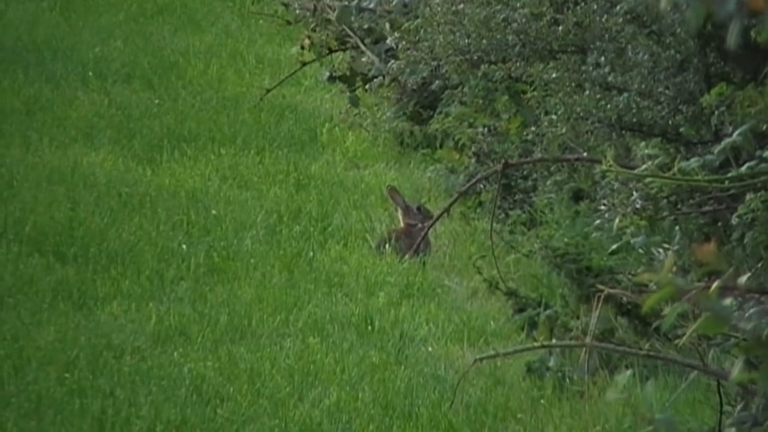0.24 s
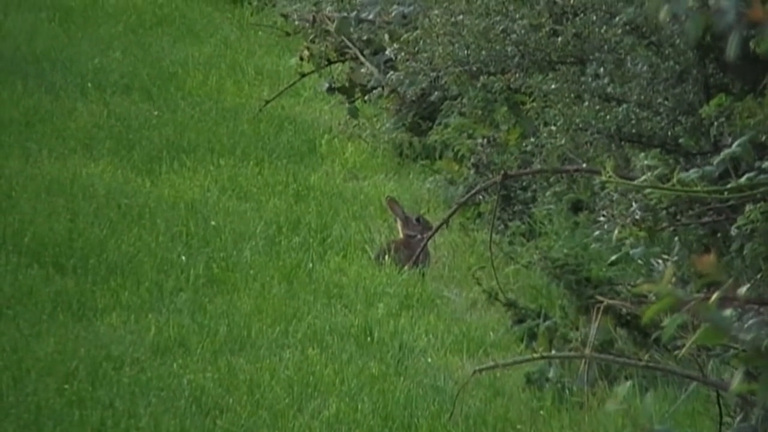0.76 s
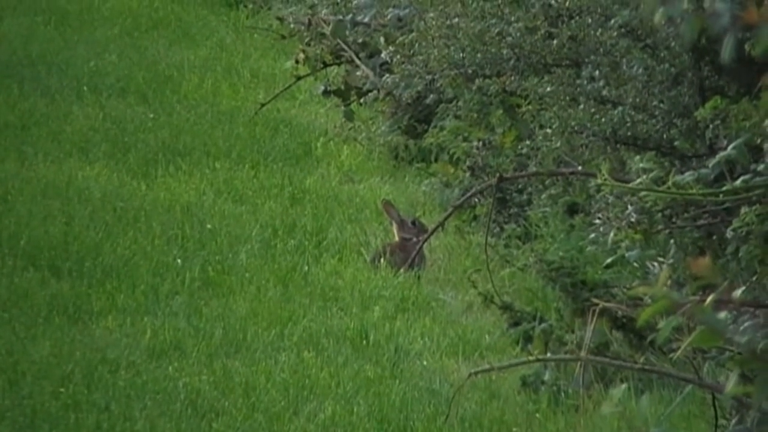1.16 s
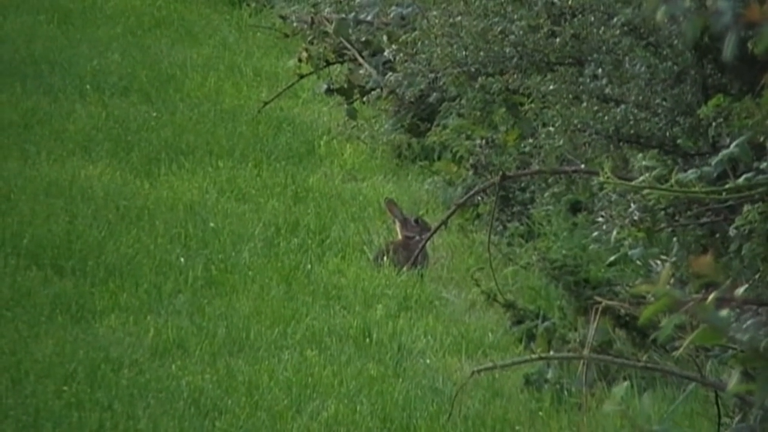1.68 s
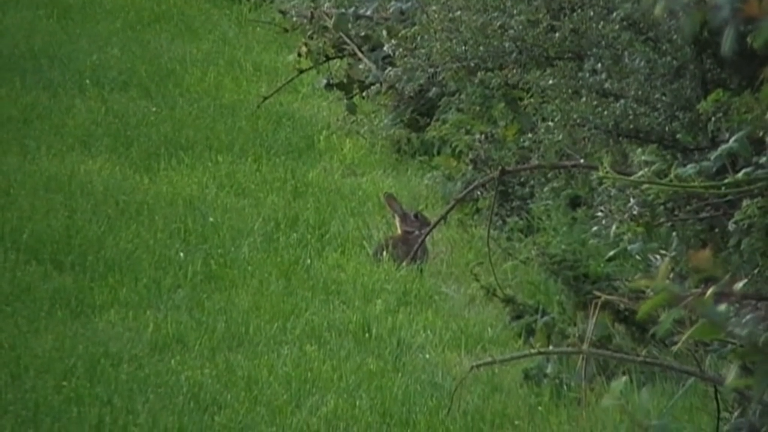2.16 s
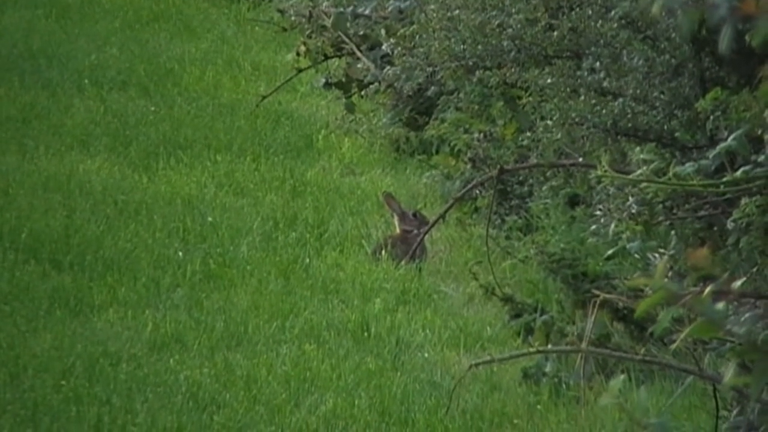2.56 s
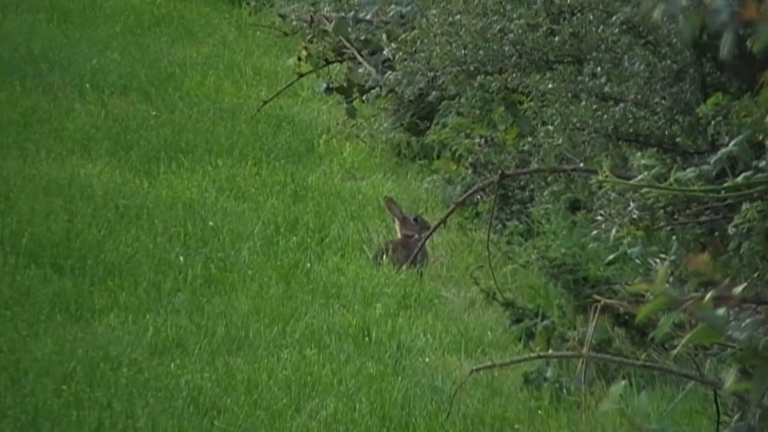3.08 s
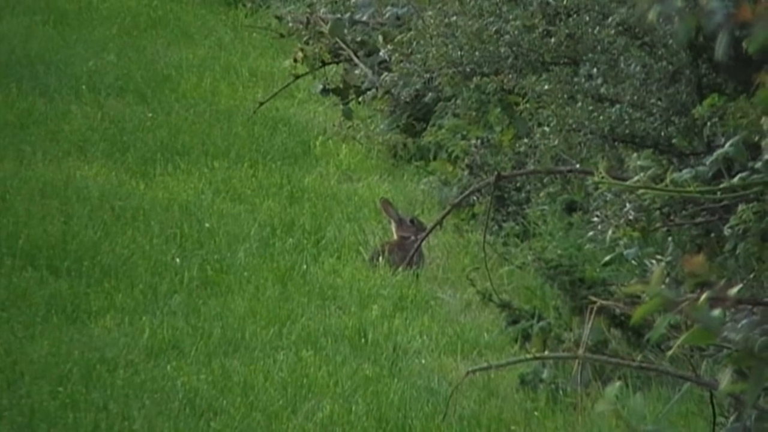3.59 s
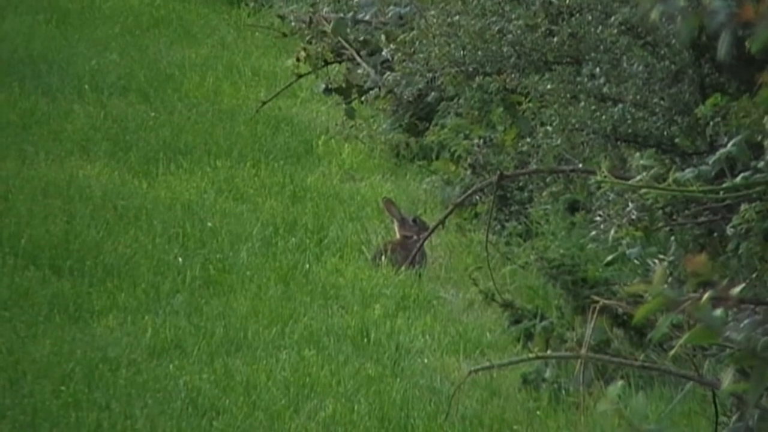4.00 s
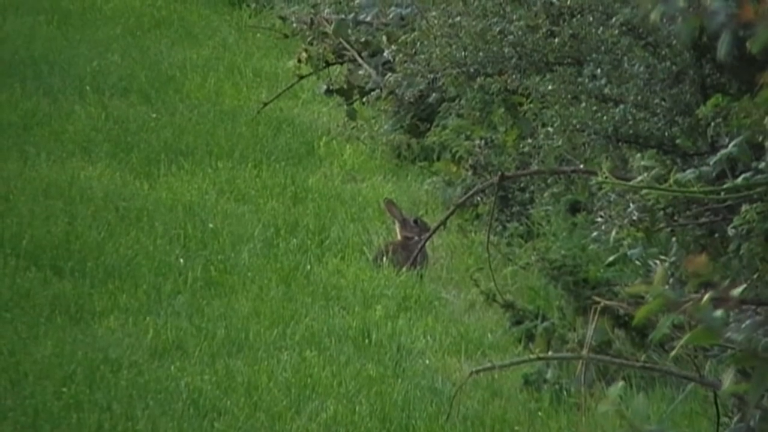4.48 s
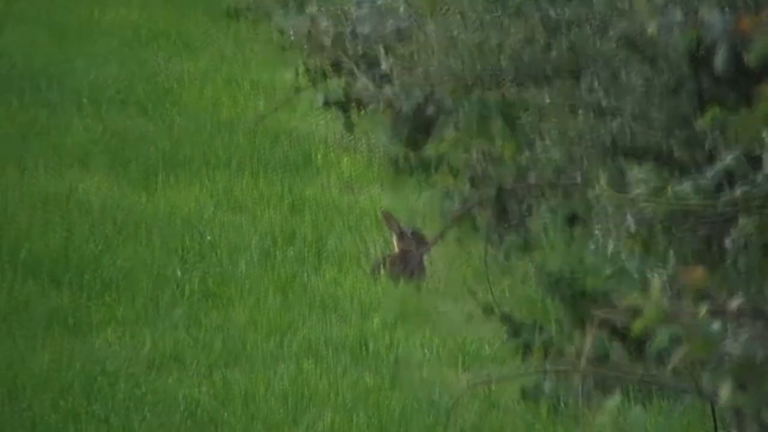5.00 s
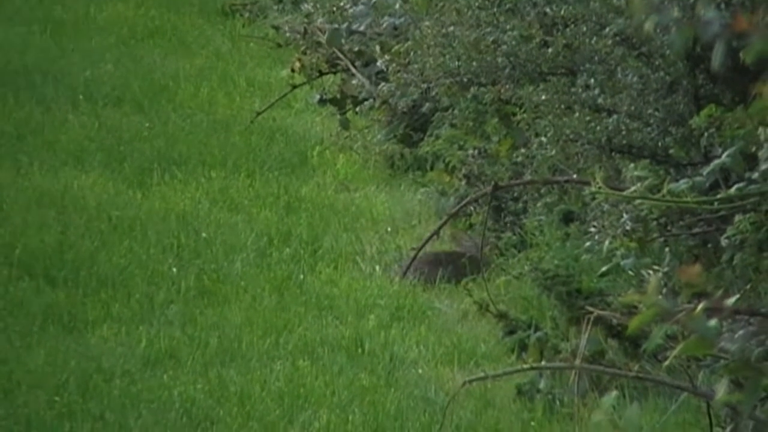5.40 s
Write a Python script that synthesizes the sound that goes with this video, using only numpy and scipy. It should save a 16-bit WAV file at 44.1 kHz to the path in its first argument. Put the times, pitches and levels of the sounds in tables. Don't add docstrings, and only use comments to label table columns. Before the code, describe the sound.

A quiet field by a hedge, heard from a microphone right beside an air rifle. Low steady road wash and moving air, a faint mains hum and a very thin camera whine continue throughout. Tiny handling ticks come at 0.3-0.4, 1.9 and 2.6 s; a minute falling bird warble at about 1.2 s. At 4.24 s a clearer wood-and-metal click, then a faint, raspy seven-note bird chatter from 4.3 to 4.9 s. At 5.06 s the spring rifle fires: several blows crammed into forty milliseconds, loud and clipped, with a short low thump, woody knock, steel clatter, bright air hiss and smaller rattling bounces until 5.15 s. Metal ring and a diffuse field echo follow, with small grip clicks near 5.3 s. At 5.33 s the pellet's bright, bassless smack returns, then twig snaps, papery leaf crackle until about 5.45 s, a pitch-sinking scattered echo and a last faint twig at 5.62 s.

```python
import sys
import numpy as np
from scipy import signal
from scipy.io import wavfile
from scipy.ndimage import uniform_filter1d

SR = 44100
rng = np.random.default_rng(int(sys.argv[2]) if len(sys.argv) > 2 else 0)


def natural_amplitude(level_db):
    exponent = np.asarray(level_db, float) / 20
    return 10 ** exponent


def master(y):
    cut = np.clip(np.atleast_2d(y).T, -1, 1)
    pcm = np.round(cut * 32767)
    wavfile.write(sys.argv[1], SR, pcm.astype(np.int16))


N = 249165
T_S = np.arange(SR // 2) / SR

SLAM_S, REBOUND_S, GRIP_S = 5.0664, 5.0945, 5.29
SMACK_S, SMACK_PAN_DB, HEDGE_PAN_DB = 5.3347, 1.5, 0.8


def evened(x):
    return x / np.sqrt(np.mean(x ** 2) + 1e-20)


def read(points, hz):
    f, value = np.transpose(points)
    return np.interp(np.log(hz + 1), np.log(f + 1), value)


def add(mix, start_s, sound, pan_db=0):
    part = mix[:, round(start_s * SR):][:, :sound.shape[-1]]
    panned = sound * natural_amplitude([[pan_db / 2], [-pan_db / 2]])
    part += panned[:, :part.shape[1]]


def onset(rise_s):
    return 1 - np.exp(-T_S / rise_s)


def swell(u):
    return np.maximum(u, 0) ** 2 * np.exp(2 - 2 * np.abs(u))


def pair(count, same):
    a, b = rng.standard_normal((2, count))
    return np.array([a, same * a + np.sqrt(1 - min(same, 1) ** 2) * b])


def slow_pair(count, same, span):
    once = uniform_filter1d(pair(count, same), span, 1)
    return evened(uniform_filter1d(once, span, 1))


def resonate(x, hz, width_hz):
    r = np.exp(-np.pi * width_hz / SR)
    poles = [1, -2 * r * np.cos(2 * np.pi * hz / SR), r * r]
    return signal.lfilter([(1 - r * r) / 2, 0, (r * r - 1) / 2], poles, x)


def resonate_twice(x, hz, width_hz):
    return resonate(resonate(x, hz, width_hz), hz, 2 * width_hz)


def body(x, modes):
    return sum((-1) ** k * natural_amplitude(db) * resonate_twice(x, hz, width_hz)
               for k, (hz, width_hz, db) in enumerate(modes))


def wash(count, size, colour, same, patchy_db, t60=None):
    frames, hz = 4 * count // size + 5, np.fft.rfftfreq(size, 1 / SR)
    a, b, c, d, patches = rng.standard_normal((frames, len(hz), 5)).T
    patches = uniform_filter1d(patches, size // 80, 0)
    patches = evened(uniform_filter1d(patches, 14, 1))
    same = np.clip(same, -1, 1)
    left = a + 1j * b
    right = same * left + np.sqrt(1 - same ** 2) * (c + 1j * d)
    z = np.array([left, right]) * natural_amplitude(read(colour, hz)[:, None] + patchy_db * patches)
    overlap = size * 3 // 4
    scale = np.std(signal.istft(z, nperseg=size, noverlap=overlap)[1])
    if t60:
        frame_s = np.arange(frames) * size / 4 / SR
        z *= natural_amplitude(-60 * frame_s / read(t60, hz)[:, None])
    return signal.istft(z, nperseg=size, noverlap=overlap)[1][:, :count] / scale


def road_and_air():
    # hz, level_db [dB per Hz]
    air_colour = [(20, -17), (45, -25.5), (82, -25.5), (110, -15.5), (195, -18), (400, -15), (840, -12),
                  (1300, -16), (2000, -21.5), (2610, -26.5), (4370, -31), (8000, -36.5), (14800, -47.5),
                  (16000, -61)]
    # hz, left_right_likeness [-1..1]
    likeness = [(60, 1), (180, 0.24), (550, 0.012), (1650, 0.16), (4970, -0.13), (15000, 0.0)]
    same = read(likeness, np.fft.rfftfreq(2048, 1 / SR))[:, None]
    return natural_amplitude(-56.5) * wash(N, 2048, air_colour, same, patchy_db=0.25)


def hum_and_whine():
    # hz, rms_db, pan_db [left minus right], waver_db
    steady_tones = [(50.03, -54.7, 0, .15), (150.09, -75, -1, .5), (250.15, -83, 0, .5),
                    (2163, -75, -11, .7), (4326, -84, -10, .7), (11536, -94, -6, 2.5), (15625, -91, -9, .7)]
    out, t = np.zeros((2, N)), np.arange(N) / SR
    for hz, db, pan_db, waver_db in steady_tones:
        sways = [np.sin(2 * np.pi * (f * t + rng.random())) for f in np.geomspace(.7, 9, 6)]
        waver = sum(sways) / np.sqrt(3)
        add(out, 0, np.sqrt(2) * natural_amplitude(db + waver_db * waver) * np.cos(2 * np.pi * hz * t), pan_db)
    return out


def bird_note(length_s, from_hz, to_hz, rough):
    t = np.arange(0, length_s, 1 / SR)
    hz = from_hz + (to_hz - from_hz) * t / length_s
    whistle = np.sqrt(2) * np.sin(2 * np.pi * np.cumsum(hz) / SR)
    rasp = slow_pair(4000, 0.49, 30)[:, :len(t)]
    return whistle * (1 - rough + rough * rasp) * np.hanning(len(t)) ** 0.27


def birds():
    # start_s, length_s, from_hz, to_hz
    warble_notes = [
        (1.165, 0.01, 4700, 4700),
        (1.182, .018, 3980, 4130),
        (1.203, 0.025, 3950, 3770),
        (1.232, .03, 3120, 3850),
        (1.257, .012, 3400, 3220),
        (1.282, .014, 2830, 2770),
    ]
    # start_s, from_hz, level_db
    chatter_notes = [
        (4.333, 1626, -60.5),
        (4.41, 2160, -59),
        (4.494, 2200, -58),
        (4.57, 2290, -58.5),
        (4.652, 2290, -56),
        (4.745, 2284, -59.5),
        (4.86, 2190, -57.5),
    ]
    out = np.zeros((2, N))
    for start_s, length_s, from_hz, to_hz in warble_notes:
        add(out, start_s, natural_amplitude(-68.5) * bird_note(length_s, from_hz, to_hz, rough=.5), -1.5)
    for start_s, hz, db in chatter_notes:
        add(out, start_s, natural_amplitude(db) * bird_note(0.0467, hz, hz * (1 - 0.077), rough=0.62), -1.5)
    return out


def ticks(rows, pan_db):
    out, t = np.zeros((2, N)), np.arange(4000) / SR
    for start_s, db, hz, width_hz in rows:
        t60_s = 0.02 * (1000 / hz) ** 0.4
        drive = natural_amplitude(-60 * t / t60_s) * pair(len(t), 0.75)
        drive[:, 0] = 0.15 * np.linalg.norm(drive[0])
        tone = resonate_twice(drive, hz, width_hz)
        tone *= np.sqrt(t60_s * SR / 14) / np.linalg.norm(tone[0])
        add(out, start_s, natural_amplitude(db) * tone, pan_db)
    return out


def handling():
    # start_s, level_db, hz, width_hz
    hand_ticks = [(.303, -57, 5200, 1200), (.401, -55, 9600, 3000), (.401, -52, 1150, 300),
                  (.433, -65, 9500, 2000), (1.867, -48, 1140, 400), (2.61, -64, 10000, 2000),
                  (4.2432, -38.5, 1040, 151), (4.2432, -38, 1206, 150), (4.2428, -45.5, 4050, 900),
                  (4.2445, -44.5, 3230, 700), (4.2428, -57, 9500, 2500), (5.241, -35, 2700, 2190),
                  (5.2415, -42, 1130, 500), (5.288, -48, 3800, 4010), (5.3075, -38, 1200, 700),
                  (5.424, -52, 168, 119)]
    return ticks(hand_ticks, pan_db=-0.5)


def twigs():
    # start_s, level_db, hz, width_hz
    twig_snaps = [
        (5.363, -32.5, 8000, 3500),
        (5.3685, -27, 8300, 1476),
        (5.408, -49.5, 8500, 4010),
        (5.417, -41.5, 7200, 3490),
        (5.428, -41.5, 4400, 1805),
        (5.618, -51, 2860, 698),
        (5.617, -58, 7960, 2460),
    ]
    return ticks(twig_snaps, pan_db=-1)


def leaves():
    # time_s, level_db
    crackle_levels = [
        (5.364, -40),
        (5.37, -30),
        (5.396, -47),
        (5.47, -86),
    ]
    s, level_db = np.transpose(crackle_levels)
    t = np.arange(s[0], s[-1], 1 / SR)
    snaps = natural_amplitude(2.5 * np.minimum(rng.exponential(1, len(t)), 3))
    snaps = snaps * (rng.random(len(t)) < 6000 / SR)
    modes = [(5350, 2500, -5), (8030, 2600, 6), (11000, 3000, -10.5)]  # hz, width_hz, level_db
    crackle = evened(body(snaps * pair(len(t), 1.0), modes))
    crackle *= natural_amplitude(np.interp(t, s, level_db) - 2.5) * signal.windows.tukey(len(t), .15)
    out = np.zeros((2, N))
    add(out, s[0], crackle, HEDGE_PAN_DB)
    return out


def hedge_scatter():
    # hz, level_db [dB per Hz]
    scatter_colour = [(500, -24.5), (1100, -18), (1500, -16), (1800, -8), (2300, -14), (3100, -12.5),
                      (3550, -8), (4100, -13), (4800, -9.5), (7300, -15.5), (11500, -18), (16000, -45.5)]
    # hz, t60_s
    scatter_t60 = [(1000, 3.6), (2000, 0.86), (4000, 0.9), (8000, 0.46), (15000, 0.16)]
    out = np.zeros((2, N))
    scatter = wash(len(T_S), 256, scatter_colour, same=1.0, patchy_db=3.3, t60=scatter_t60)
    add(out, SMACK_S + 0.0033, natural_amplitude(-45.5) * scatter, HEDGE_PAN_DB)
    from_hz, to_hz, sink_s, sink_db, sink_t60_s = 2100, 1650, .35, -50.5, 1.3
    turns = np.cumsum(to_hz + (from_hz - to_hz) * np.exp(-2 * T_S / sink_s)) / SR
    flutter = slow_pair(len(T_S), 0.99, 150) * onset(0.022)
    add(out, SMACK_S, natural_amplitude(sink_db - 60 * T_S / sink_t60_s) * flutter * np.sin(2 * np.pi * turns))
    return out


def smack():
    # hz, level_db, rise_ms, start_ms
    pulses = [(8200, -2, .125, .42), (2400, -3.5, .25, .58), (4800, -20, .34, .5), (10500, -11, .11, .42)]
    out, ms = np.zeros((2, N)), T_S[:128] * 1000
    hit = sum(natural_amplitude(db) * swell((ms - start_ms) / rise_ms) * np.sin(2 * np.pi * hz * (ms - start_ms) / 1000)
              for hz, db, rise_ms, start_ms in pulses)
    hit = signal.lfilter(*signal.butter(4, 1250, "high", fs=SR), resonate(hit, 7000, 9000))
    add(out, SMACK_S, hit, SMACK_PAN_DB)
    copies = pair(len(T_S), 0.99) * (rng.random(len(T_S)) < 5000 / SR)
    copies *= natural_amplitude(-18.5 - 60 * T_S / 0.2) * (T_S > .0012)
    modes = [(2470, 1096, -0.5), (4700, 750, 0), (6870, 1640, -1.0), (10500, 2000, -11.0)]
    add(out, SMACK_S, body(copies, modes), SMACK_PAN_DB)
    return out


def field_answer():
    # hz, level_db [dB per Hz]
    echo_colour = [(300, -28), (900, -20), (2100, 2), (3500, -1.5), (5000, 0.5), (7600, -1), (11000, -7),
                   (16000, -30.5)]
    # hz, t60_s
    echo_t60 = [(500, 0.56), (3000, 0.66), (6000, 0.78), (9000, 1.75), (15000, 2.7)]
    out = np.zeros((2, N))
    echo = wash(len(T_S), 256, echo_colour, same=0.84, patchy_db=-0.5, t60=echo_t60)
    echo *= onset(.01) * natural_amplitude(-150 * np.maximum(T_S - .26, 0))
    add(out, SLAM_S, natural_amplitude(-48.5 + 7.5) * echo)
    return out


def ringing_spring_and_stock():
    # hz, level_db, t60_s, pan_db [left minus right]
    spring_modes = [(325, -54, 1.0, -8), (620, -24, .08, 0), (1222, -13, .06, 1.5), (2390, -48, 3.5, -10),
                    (5426, -57, 2.5, 2.5), (5502, -50, .62, 0)]
    # hz, level_db, t60_s, pan_db [left minus right]
    stock_rings = [(899, -31, .32, 1.2), (1060, -16, .06, 2.5), (1238, -22, .09, 0), (1935, -21, .07, 0),
                   (2067, -31, .12, 0)]
    out = np.zeros((2, N))
    grip_db = -160 * np.maximum(T_S + SLAM_S - GRIP_S, 0)
    for hz, db, t60_s, pan_db in spring_modes:
        add(out, SLAM_S, natural_amplitude(db - 60 * T_S / t60_s + grip_db) * np.sin(2 * np.pi * hz * T_S), pan_db)
    lagged_s = T_S - [[.00022], [0]]
    for hz, db, t60_s, pan_db in stock_rings:
        ring = natural_amplitude(db - 60 * T_S / t60_s) * onset(0.00018) * np.sin(2 * np.pi * hz * lagged_s)
        add(out, REBOUND_S, ring, pan_db)
    return out


def recoil_and_muzzle():
    out = np.zeros((2, N))
    thump = natural_amplitude(-14.5 - 60 * T_S / 0.029) * np.sin(2 * np.pi * 175 * T_S) * onset(0.002)
    add(out, SLAM_S - .004, thump, 5.5)
    crack = natural_amplitude(-7 - 60 * T_S / .005) * pair(len(T_S), .8)
    add(out, SLAM_S + .0003, resonate(crack, 6000, 9000))
    return out


def action():
    # start_s, knock_db, hiss_db, knock_t60_s
    blows = [(5.0582, -9.5, -28.5, 0.072), (5.0622, -4, -13.5, 0.03), (5.0642, -7.5, -26, 0.024),
             (5.0664, -4.5, -2.5, 0.0092), (5.0705, -15.5, -9.5, 0.048), (5.0822, -36.5, -9.5, .025),
             (5.0838, -5, -7.5, 0.017), (5.0885, -34, -18, 0.048), (5.0940, -10.5, -15, 0.036),
             (5.0966, -17, -18, 0.03), (5.1005, -19, -27, 0.065), (5.114, -29.5, -37, 0.034),
             (5.131, -27, -37, 0.066), (5.141, -41, -37, 0.043), (5.149, -35, -37.5, 0.045)]
    # hz, width_hz, level_db
    stock_modes = [(196, 120, -24.5), (430, 330, -10.5), (630, 240, -6.5), (934, 350, -2.5),
                   (1215, 245, -2), (1994, 800, -8)]
    # hz, width_hz, level_db
    receiver_modes = [(588, 42, -7), (872, 51, -8), (1058, 240, -10), (1202, 48, -1), (1930, 82, -5),
                      (2055, 58, -8), (2250, 160, -2.5), (2430, 110, -10)]
    # hz, width_hz, level_db
    cylinder_modes = [(95, 85, -17), (2540, 930, -8.5), (3220, 2050, -14.5), (4650, 700, -6.5)]
    # hz, width_hz, level_db
    nozzle_modes = [(5860, 2600, -7), (8300, 810, -1), (9700, 1100, -8.5), (11800, 3600, -15.5),
                    (14800, 2500, -24)]
    knock, hiss = np.zeros((2, N)), np.zeros((2, N))
    rise = onset(0.00018)
    for start_s, knock_db, hiss_db, t60_s in blows:
        rattle = natural_amplitude(-60 * T_S / t60_s) * rise * pair(len(T_S), 0.61)
        rattle[[0, 1], rng.integers(4, 16, 2)] = 3.0
        add(knock, start_s, natural_amplitude(knock_db + 11.0) * rattle, pan_db=1.9)
        air_db = hiss_db + 8.0 - 60 * T_S / (1.5 * t60_s)
        add(hiss, start_s, natural_amplitude(air_db) * rise * pair(len(T_S), 0.59))
    left, right = body(knock, stock_modes[:3])
    flip = -0.52
    low_wood = np.array([left, flip * left + np.sqrt(1 - flip ** 2) * right])
    wood = low_wood - body(knock, stock_modes[3:])
    fading_db = -250 * np.maximum(np.arange(N) / SR - SLAM_S, 0)
    steel = body(knock, receiver_modes) + body(knock * natural_amplitude(fading_db), cylinder_modes)
    return wood + steel + body(hiss, nozzle_modes)


def scene():
    background = road_and_air() + hum_and_whine() + birds() + handling()
    hedge = twigs() + leaves() + hedge_scatter() + smack()
    rifle = field_answer() + ringing_spring_and_stock() + recoil_and_muzzle() + action()
    return background + hedge + rifle


def low_pass(x):
    return signal.sosfilt(signal.butter(12, 16280, fs=SR, output="sos"), x)


def record(dry):
    return low_pass(np.clip(dry, -1, 1))


dry = scene()
out = record(dry)
master(out)
```